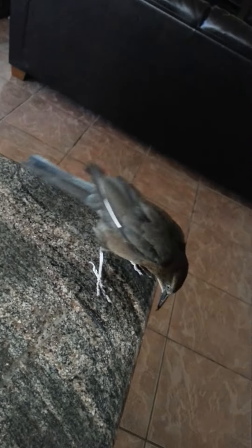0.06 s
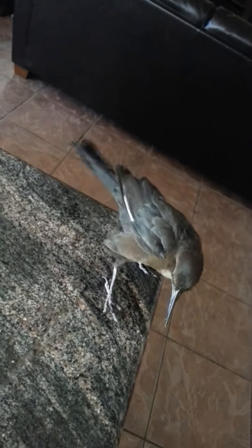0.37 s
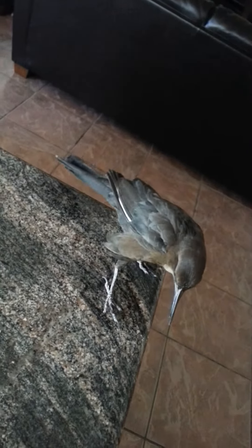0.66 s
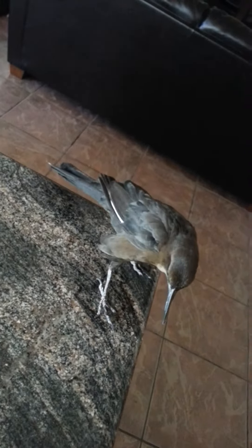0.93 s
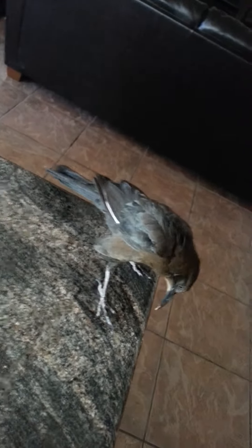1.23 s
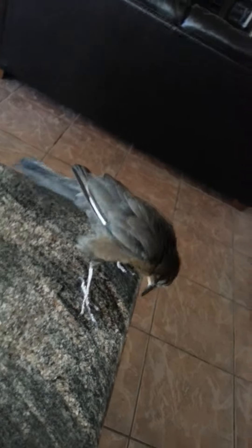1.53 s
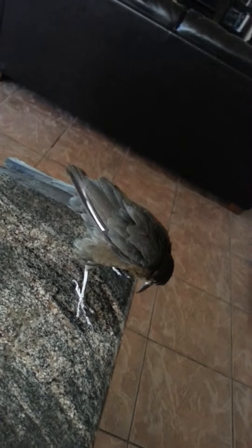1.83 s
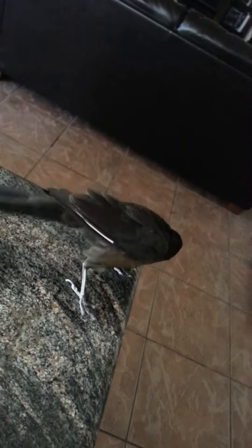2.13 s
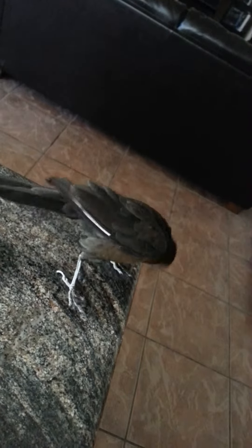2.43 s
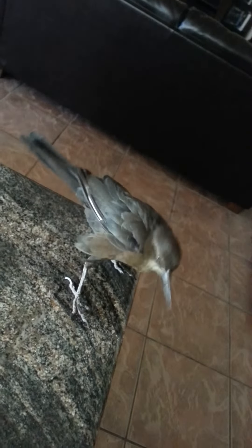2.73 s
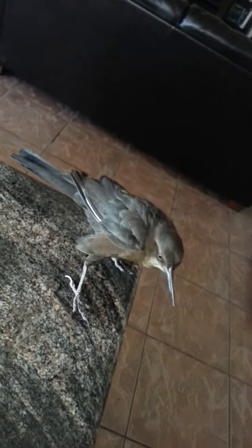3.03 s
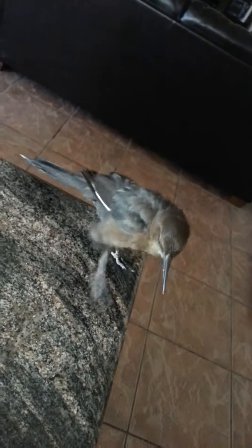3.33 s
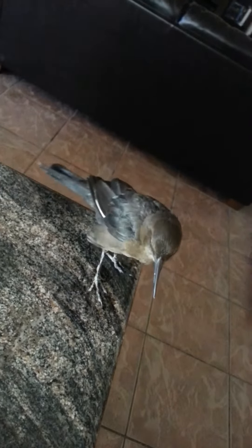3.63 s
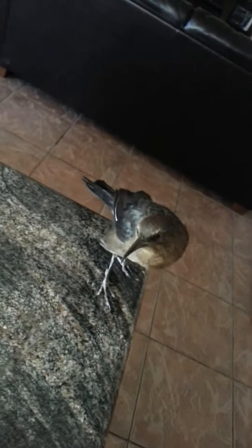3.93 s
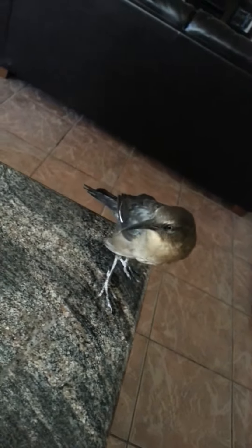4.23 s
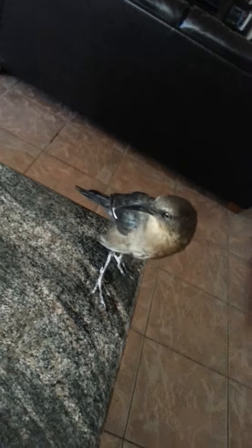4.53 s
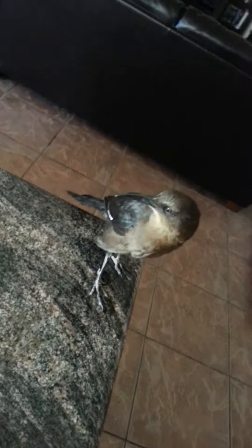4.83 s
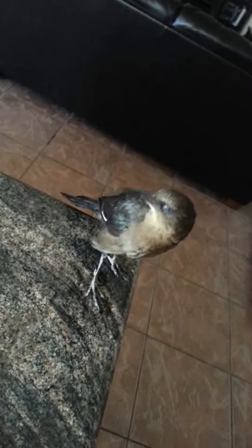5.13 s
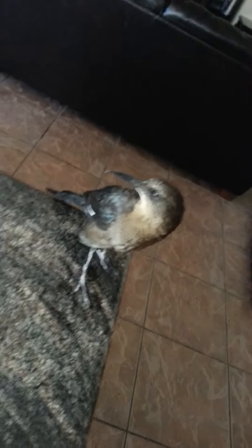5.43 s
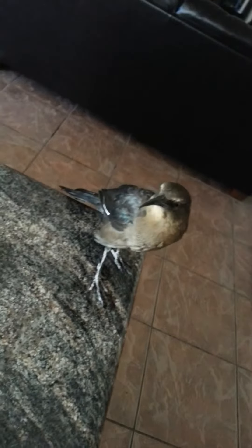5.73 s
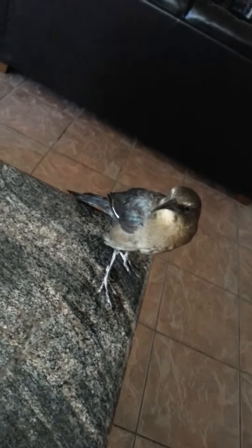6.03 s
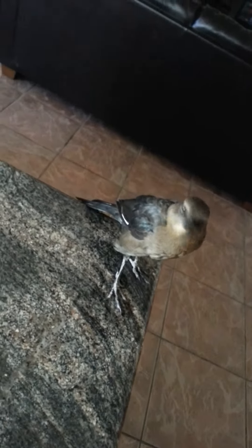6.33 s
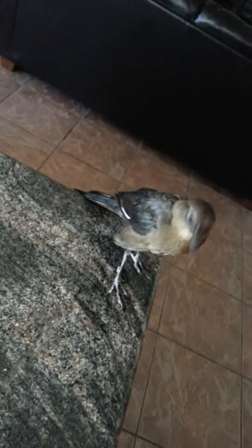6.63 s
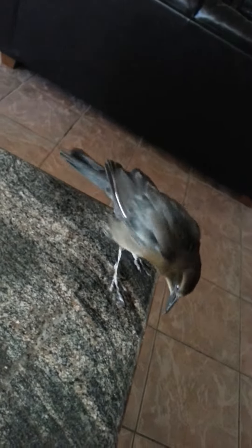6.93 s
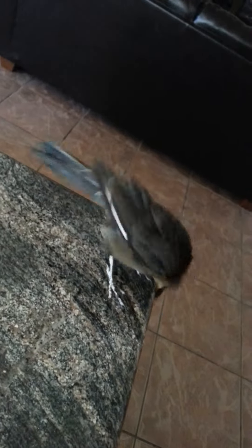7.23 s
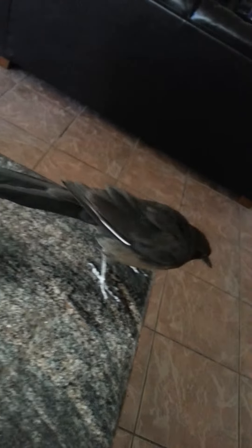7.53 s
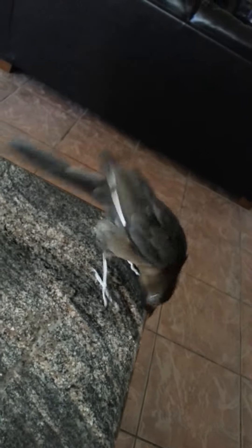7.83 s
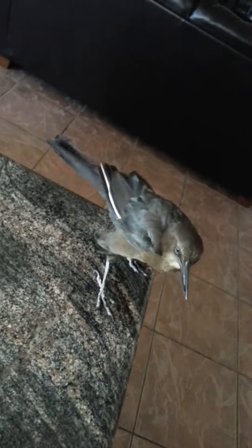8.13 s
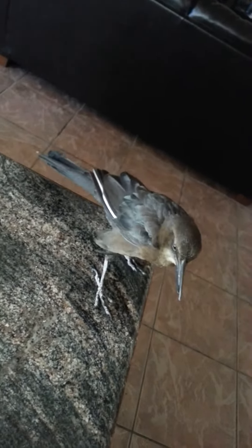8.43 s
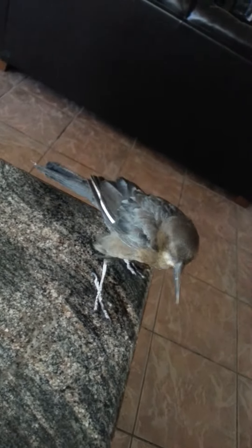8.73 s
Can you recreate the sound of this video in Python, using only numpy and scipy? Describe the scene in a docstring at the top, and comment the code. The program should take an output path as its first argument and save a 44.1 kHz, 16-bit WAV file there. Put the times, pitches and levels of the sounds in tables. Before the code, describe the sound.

A small bird's beak and claws tick irregularly on rug and tile, amid close cloth scuffs and handling bumps.

```python
"""Bird pecking at a rug

A small bird pecks at a rug's edge on a tiled floor: beak and claws tick, and one hard peck rings out.
Close by, cloth scuffs in short strokes at the right microphone port of a hand-held phone, while the
hand rubs, bumps and shifts the booming case. An appliance hums in the small, hard room, and a faint
squeak slides down near the end."""
import sys
import numpy as np
from scipy import signal
from scipy.fft import rfft, irfft
from scipy.io import wavfile
from scipy.ndimage import uniform_filter1d

SR = 44100
rng = np.random.default_rng(int(sys.argv[2]) if len(sys.argv) > 2 else 0)


def log_audio(samples):
    """Write samples as a 16-bit WAV file to the path given in sys.argv[1]."""
    # one column per channel
    frames = np.atleast_2d(samples).T
    # limit to full scale, then quantise
    limited = np.clip(frames, -1, 1)
    pcm = np.round(limited * 32767).astype(np.int16)
    wavfile.write(sys.argv[1], SR, pcm)


N = 396018
T = np.arange(N) / SR

# How the case carries vibration to the ports. Each row: frequency in Hz, left minus right in dB.
CASE_BALANCE = [(100, -4.5), (170, -1), (270, 6), (500, 5.5), (1000, 7), (2000, 8.5)]


def undb(db):
    """Decibels to gain."""
    return 10 ** (np.asarray(db) / 20)


def unit(x):
    """Scale a sound so that the mean of its channels has rms 1."""
    return x / np.sqrt(np.mean(np.atleast_2d(x).mean(axis=0) ** 2))


def pan(db):
    """Left and right gains with mean 1, from left minus right in dB."""
    gains = undb(np.array([[db], [-db]]) / 2)
    return gains / gains.mean()


def curve(rows, column=1, outside=None):
    """One column of a table, joined by straight lines in time."""
    rows = np.array(rows)
    return np.interp(T, rows[:, 0], rows[:, column], outside, outside)


def shape(points):
    """Gain at every frequency from (Hz, dB) points."""
    hz, db = np.transpose(points)
    return undb(np.interp(np.log(np.arange(N // 2 + 1) * SR / N + 1), np.log(hz), db))


def ports(balance):
    """Left and right gains with mean power 1 at every frequency, from (Hz, left minus right dB) points."""
    side = np.sqrt(shape(balance))
    return np.sqrt(2) * np.array([side, 1 / side]) / np.hypot(side, 1 / side)


def colour(x, gain):
    """Filter by a gain at every frequency."""
    return irfft(rfft(x) * gain, N)


def highpass(x, hz):
    """Steep cut of the lows."""
    return signal.sosfilt(signal.butter(4, hz, "high", fs=SR, output="sos"), x)


def bandpass(x, low_hz, high_hz, order):
    """Keep the band between two frequencies."""
    return signal.sosfilt(signal.butter(order, [low_hz, high_hz], "band", fs=SR, output="sos"), x)


def resonate(x, hz):
    """A broad resonance around one pitch."""
    return signal.lfilter(*signal.iirpeak(hz, Q=1.6, fs=SR), x)


def walk(rate):
    """Smooth random drift with spread near 1, taking `rate` new values a second."""
    size = max(int(SR / rate), 2)
    steps = np.repeat(rng.standard_normal(N // size + 1), size)
    return 1.3 * uniform_filter1d(uniform_filter1d(steps, size), size)[:N]


def ring(modes, t):
    """Decaying modes (Hz, t60 s, dB) after one blow."""
    return sum(undb(db - 60 * t / t60) * np.sin(2 * np.pi * hz * t) for hz, t60, db in modes)


def add(out, start, x):
    """Mix a short sound in at `start` seconds."""
    i = max(int(start * SR), 0)
    out[:, i:i + x.shape[-1]] += x[..., :N - i]


def slips(rate, spread_db):
    """Tiny random releases of friction, uneven in size, about `rate` a second."""
    size = undb(spread_db * np.minimum(rng.exponential(size=N), 5))
    return unit((rng.random(N) < rate / SR) * size * rng.choice([-1, 1], N))


def contacts(rows, rise_db_per_s, fall_db_per_s):
    """Gain of sliding contacts (start s, length s, dB): each swells, holds and dies away."""
    level_db = np.full(N, -140.)
    for start, length, db in rows:
        near = slice(*np.searchsorted(T, [start - .5, start + length + .5]))
        t = T[near] - start
        abruptness = 1 + .02 / (length + .02)  # brief flicks have slopes up to twice as steep
        drop_db = rise_db_per_s * np.maximum(-t, 0) + fall_db_per_s * np.maximum(t - length, 0)
        level_db[near] = np.maximum(level_db[near], db - abruptness * drop_db)
    return undb(level_db)


def room(x, wet_db, t60, first_echo_s=0.0048):
    """Floor and furniture answer within milliseconds, then the walls blur the sound."""
    t = T[:SR // 2]
    decay = undb(-60 * t / t60) + 1.6 * undb(-60 * t / .05)
    echoes = rng.standard_normal((2, len(t))) * (t > first_echo_s) * decay
    echoes /= np.sqrt(np.sum(echoes ** 2, axis=1, keepdims=True))
    return x + undb(wet_db) * signal.fftconvolve(x.mean(axis=0)[None], echoes, axes=1)[:, :N]


def room_air():
    """A bed of still air, alike at both ports in the bass and wide in the treble."""
    # Room tone. Each row: frequency in Hz, relative level in dB.
    spectrum = [(32, -42.5), (55, -10), (111, -3.5), (271, -4), (343, -1.5), (424, -10), (588, -10),
                (1080, -22), (2090, -21), (3190, -25.5), (10500, -23), (15000, -29)]
    # How the air reaches the ports. Each row: frequency in Hz, left minus right in dB.
    balance = [(60, -1.5), (250, 3.5), (1800, 6), (4000, 1), (7000, -3.5), (14000, -1)]
    centre = rng.standard_normal(N)
    width = colour(rng.standard_normal(N), shape([(100, -9), (500, -6.5), (1500, 1.5)]))
    air = colour(centre + np.array([[1], [-1]]) * width, shape(spectrum))
    return unit(colour(air, ports(balance))) * undb(-62.5)


def appliance_hum():
    """An appliance hums on three low tones, each wavering in level and phase."""
    # The hum's tones. Each row: frequency in Hz, relative level in dB.
    partials = [(120, -2.5), (240, -13.5), (341, -9)]
    # The hum swells and fades. Each row: time in seconds, level in dB.
    swell = [(0, -60.5), (1.0, -61), (1.3, -65), (4.5, -64.5), (7.9, -62), (8.2, -64), (8.98, -62)]
    hum = sum(undb(db + 4.1 * walk(5)) * np.sqrt(2) * np.sin(2 * np.pi * hz * T + walk(9))
              for hz, db in partials)
    return hum * undb(curve(swell)) * pan(2.7)


def squeak():
    """A faint squeak further off: two thin, unsteady tones sliding down."""
    # The glide. Each row: time in seconds, upper pitch in Hz, level in dB.
    glide = [(8.45, 2660, -97), (8.5, 2480, -70.5), (8.55, 2434, -70), (8.59, 2400, -74), (8.63, 2390, -99)]
    hz = curve(glide) * (1 + .028 * walk(400))
    phase = 2 * np.pi * np.cumsum(hz) / SR
    tones = np.sin(phase) + np.sin(.83 * phase)
    return tones * undb(curve(glide, column=2, outside=-140)) * pan(1.5)


def thuds():
    """The phone shifts in the hand: a deep wobble with a short rub."""
    # Soft thuds. Each row: start in seconds, level in dB, pitch in Hz.
    shifts = [(4.922, -25.5, 87), (4.974, -26, 76.5), (5.213, -33.5, 90), (5.263, -39, 74.6),
              (5.395, -41, 93)]
    out, t = np.zeros((2, N)), T[:SR // 6]
    for start, db, hz in shifts:
        wobble = ring([(hz, .11, 0), (hz * 1.54, .07, -9)], t) * pan(-2.7)
        friction = unit(bandpass(rng.standard_normal(len(t)), 150, 420, order=2))
        rub = undb(-18 - 60 * t / 0.22) * friction * pan(5.9)
        attack = 1 - np.exp(-t / 0.0082)
        add(out, start, undb(db) * attack * (wobble + rub))
    return out


def grip_rubs():
    """The grip sticks and slips on the case, which booms under it."""
    # Slides of the grip. Each row: start in seconds, length in seconds, level in dB.
    rubs = [(.35, 0.027, -48), (.645, 0.17, -50), (.88, 0.1, -59.5), (2.79, 0.12, -49),
            (4.03, 0.056, -51.5), (4.25, 0.033, -52), (5.53, 0.37, -55.5), (5.91, 0.075, -38.5),
            (6.007, 0.024, -34), (6.07, 0.091, -46), (6.28, 0.17, -56), (6.77, 0.25, -50),
            (6.965, 0.017, -37), (7.0, .1, -45.5), (7.295, 0.0046, -55), (7.42, 0.078, -48.5),
            (7.59, 0.067, -46), (7.745, 0.078, -54.5), (8.715, 0.031, -47)]
    # Tone of the rubbed case. Each row: frequency in Hz, relative level in dB.
    spectrum = [(53, -46.5), (90, -27.5), (109, -5), (193, 0.5), (279, 1.5), (320, 3), (402, -6.5),
                (438, -5), (638, -19), (902, -20.5), (1100, -21.5), (1430, -43.5), (2420, -120)]
    friction = unit(colour(slips(rate=1400, spread_db=1.06), shape(spectrum)))
    pressure = contacts(rubs, rise_db_per_s=450, fall_db_per_s=280)
    return colour(friction * pressure, ports(CASE_BALANCE))


def finger_drag():
    """One finger drags slowly over the case; its stutter sets the case ringing."""
    # The drag: start in seconds, length in seconds, level in dB.
    drag = (3.85, 0.15, -34.5)
    # Ring under the finger. Each row: frequency in Hz, t60 in seconds, relative level in dB.
    modes = [(205, 0.061, -36), (262.6, 0.14, -15.5), (394, 0.13, -5), (490, 0.15, 10.5), (1010, 0.11, 0),
             (1285, .07, -17), (1810, .04, -21)]
    # Tone of the sliding skin. Each row: frequency in Hz, relative level in dB.
    spectrum = [(53, -50), (90, -6.5), (209, 13), (238, 0), (259, 11), (368, 4.5), (441, -3.5),
                (494, -28.5), (602, -32), (646, -9), (775, -24), (985, -7.5), (1090, -44), (1300, -9.5),
                (2600, -54.5), (3380, -66), (5720, -120)]
    stutter = slips(rate=560, spread_db=3.5)
    ringing = unit(signal.fftconvolve(stutter, ring(modes, T[:SR // 10]))[:N])
    skin = unit(colour(slips(rate=2500, spread_db=-2.5), shape(spectrum)))
    pressure = contacts([drag], rise_db_per_s=370, fall_db_per_s=500)
    return colour((undb(-10.5) * ringing + skin) * pressure, ports(CASE_BALANCE))


def bumps():
    """A fleshy push booms the case around a pitch set by where it lands; a nail knocks its high modes."""
    # Hand on case. Each row: start in seconds, peak in dB, knock over boom in dB, boom pitch in Hz.
    blows = [(0.37, -48.5, 4, 119), (.778, -35.5, -13, 187), (1.171, -37, -8, 269), (1.257, -45, -14, 246),
             (1.554, -37.5, -13, 326), (1.915, -46, -18.5, 326), (2.425, -45.5, -16, 298),
             (2.829, -30, -23, 193), (3.228, -41.5, -11, 262), (3.3, -37, -10, 303), (4.654, -31, -8, 420),
             (4.711, -41, -20, 318), (4.919, -38.5, -22, 339), (6.002, -14.5, -12.5, 266),
             (6.106, -21.5, 22, 546), (6.287, -38, -6, 307), (6.383, -33.5, 16, 538),
             (6.84, -31.5, -16, 237), (6.957, -10.5, -14.5, 310), (6.973, -20, -25, 338),
             (6.981, -24.5, 3, 339), (7.591, -36, -0.5, 264), (7.67, -25.5, -3.5, 258)]
    # Low and high modes of the case. Each row: frequency in Hz, t60 in seconds, relative level in dB.
    boom_modes = [(162, 0.17, -7.5), (210, .05, -5.5), (265, 0.061, 5), (333.2, 0.074, 3),
                  (444, 0.047, -4.5)]
    knock_modes = [(850, 0.045, 0), (982, 0.03, 0.5), (1310, .02, -14.5), (1950, .02, -4.5),
                   (2320, 0.011, -11.5)]
    out, t = np.zeros((1, N)), T[:SR // 6]
    for start, db, knock_db, hz in blows:
        scuff = 0.091 * undb(-60 * t / 0.028) * rng.standard_normal(len(t))
        push = (t == 0) + scuff
        boom = signal.fftconvolve(push, ring(boom_modes, t))[:len(t)]
        boom = resonate(highpass(boom, 140), hz)
        knock = highpass(signal.fftconvolve(push, ring(knock_modes, t))[:len(t)], 650)
        blow = boom / abs(boom).max() + undb(knock_db) * knock / abs(knock).max()
        add(out, start, undb(db) * blow / abs(blow).max())
    return colour(out, ports(CASE_BALANCE))


def fibres(spectrum, rate, spread_db, patchy_db, shared):
    """Threads slip in bunches that start at once and die away; the two ports share some of them."""
    # Where the cloth sits between the ports. Each row: frequency in Hz, left minus right in dB.
    balance = [(500, -1), (1200, 4.5), (2000, 6.5), (3000, -3), (4500, 0), (7000, -21), (10000, -11.5),
               (14000, -4.5)]
    separate = np.array([slips(rate, spread_db) for _ in range(2)])
    grains = np.sqrt(shared) * slips(rate, spread_db) + np.sqrt(1 - shared) * separate
    onsets = rng.random(N) < 260 / SR
    bunches = signal.lfilter([1], [1, -np.exp(-1 / (0.0059 * SR))], onsets)
    surge = np.minimum((bunches - bunches.mean()) / bunches.std(), 2.5)
    return unit(colour(grains * undb(patchy_db * surge), shape(spectrum) * ports(balance)))


def folds(x, depth_db, width_hz, hold_s=.05):
    """The folds of the cloth keep moving, so its resonances come and go."""
    hz, times, spectra = signal.stft(x, SR, nperseg=512)
    ripple = rng.standard_normal(spectra.shape[1:])
    for _ in range(2):
        ripple = uniform_filter1d(ripple, max(int(width_hz / hz[1]), 1), axis=0)
        ripple = uniform_filter1d(ripple, max(int(hold_s / times[1]), 1), axis=1)
    return signal.istft(spectra * undb(depth_db * ripple / ripple.std()), SR, nperseg=512)[1][:, :N]


def cloth():
    """Each stroke hisses and the weave drags coarsely; the finest threads add a sheen to light strokes."""
    # Scuffs. Each row: start in seconds, length in seconds, level in dB, coarse drag over hiss in dB.
    strokes = [(0.0, 0.014, -51, -7.5), (0.043, 0.048, -56, -11), (.15, .005, -56.5, -9),
               (0.232, 0.023, -46.5, -12.5), (0.347, 0.027, -51.5, -4), (0.473, 0.023, -54, -11),
               (0.613, .03, -50.5, -16.5), (0.639, 0.037, -46.5, -11), (0.727, 0.043, -60.5, -4),
               (0.868, 0.052, -46.5, -8), (0.943, 0.027, -45, -7.5), (1.024, 0.043, -52.5, -21),
               (1.082, 0.025, -47.5, -10.5), (1.17, 0.02, -54, -10.5), (1.396, 0.034, -50.5, -14),
               (1.512, 0.15, -52, -14), (1.722, 0.026, -46.5, -14.5), (1.782, .02, -57, -15),
               (1.835, 0.027, -51.5, -12), (1.904, 0.022, -51.5, -15), (1.975, 0.031, -50, -13),
               (2.038, .02, -55, -21), (2.416, .02, -50, -8.5), (2.486, 0.028, -58, -12),
               (2.539, 0.022, -49, -14), (2.591, 0.041, -58.5, -9.5), (2.713, 0.0068, -58, -24),
               (2.778, 0.097, -48, -7), (2.888, 0.025, -45, -4.5), (2.953, 0.052, -59, -18),
               (3.115, 0.012, -61.5, -11), (3.249, 0.013, -53.5, -20), (3.29, 0.017, -51, -11),
               (3.356, 0.1, -52, -17), (3.507, .03, -37.5, -10.5), (3.559, 0.022, -46, -9),
               (3.857, 0.041, -49.5, -4.5), (3.913, 0.051, -58.5, 4.5), (4.063, 0.047, -51.5, -11),
               (4.151, .07, -50, -14), (4.239, 0.067, -47.5, -9.5), (4.557, 0.016, -56.5, -13),
               (4.661, 0.011, -44, -7.5), (4.704, 0.094, -50, -11), (4.925, 0.017, -63, -14),
               (5.099, 0.019, -52.5, -22), (5.324, .005, -57.5, -12), (5.382, 0.13, -56.5, -15),
               (5.507, .13, -49, -8.5), (5.699, 0.088, -46.5, -9), (5.775, 0.15, -41, -10.5),
               (5.908, .11, -35, -10.5), (6.047, 0.075, -39.5, -6), (6.219, 0.02, -41.5, -15.5),
               (6.285, 0.068, -44.5, -9), (6.356, 0.077, -39.5, -8), (6.485, 0.028, -43.5, -19),
               (6.544, 0.1, -51, -11), (6.778, 0.13, -43, -8), (6.963, 0.065, -32.5, -9.5),
               (7.05, 0.024, -28, -18.5), (7.096, 0.059, -33.5, -17), (7.19, 0.032, -45.5, -15.5),
               (7.253, 0.057, -58, -2.5), (7.4, 0.07, -34.5, -12.5), (7.52, 0.056, -48.5, -13),
               (7.595, 0.079, -45, -6.5), (7.762, 0.051, -36, -12.5), (7.998, 0.0061, -57.5, -13),
               (8.241, .01, -62.5, -17), (8.32, 0.0073, -62, -13)]
    # Cloth stirring faintly on the phone. Each row: start in seconds, end in seconds, level in dB.
    resting = [(0.0, 2.2, -69.5), (2.42, 3.02, -70.5), (3.25, 3.66, -63), (4.05, 5.1, -70.5),
               (5.35, 7.96, -66)]
    # The cloth's three textures. Each row: frequency in Hz, relative level in dB.
    hiss_spectrum = [(1470, -21.5), (2500, -13.5), (2880, -13.5), (3500, -11), (5050, -8), (5600, -6.5),
                     (6060, -4.5), (6880, 2.5), (7450, 1.5), (8400, -5.5), (9800, -17), (12700, -51.5),
                     (21600, -120)]
    coarse_spectrum = [(290, -32.5), (500, 1), (690, -7.5), (860, 2.5), (1150, -0.5), (1450, -1),
                       (1820, 4.5), (2100, -3), (2700, -6), (4000, -4.5), (5200, -35), (8800, -92)]
    sheen_spectrum = [(7500, -31.5), (9300, -1), (10200, -1.5), (11500, -5.5), (13000, -6.5), (14500, -18),
                      (16000, -36)]
    slopes = dict(rise_db_per_s=620, fall_db_per_s=255)
    ordinary_stroke_db = -49.5
    stir = contacts([(start, end - start, db) for start, end, db in resting], **slopes)
    stir *= undb(3.5 * walk(16))
    slides = [(start, length, db) for start, length, db, _ in strokes]
    drags = [(start, length, db + coarse_db) for start, length, db, coarse_db in strokes]
    slide_gain = np.hypot(contacts(slides, **slopes), stir)
    drag_gain = np.hypot(contacts(drags, **slopes), undb(-6.5) * stir)
    hiss = fibres(hiss_spectrum, rate=9000, spread_db=2.0, patchy_db=1.87, shared=0.16)
    coarse = fibres(coarse_spectrum, rate=4500, spread_db=3.5, patchy_db=2.5, shared=0.12)
    sheen = fibres(sheen_spectrum, rate=14000, spread_db=3.5, patchy_db=2.0, shared=0.16)
    effort_db = np.maximum(20 * np.log10(slide_gain) - ordinary_stroke_db, -30)
    treble = hiss + undb(-9.5 - 0.3 * effort_db) * sheen  # harder strokes are duller
    treble[0] *= undb(-0.0339 * effort_db)  # and lie closer to the right port
    return folds(slide_gain * treble + drag_gain * coarse, depth_db=2.4, width_hz=380)


def ticks():
    """Each tick is a sharp crack that catches again and rings the microphone port near 7.5 kHz."""
    # Beak, claws and snagging threads. Each row: start in seconds, peak in dB, left minus right in dB.
    hits = [(0.4752, -32.5, 0), (0.501, -31.5, -3), (0.532, -38, -6), (0.9436, -27.5, -3), (0.967, -29, 0),
            (1.0835, -31, -21), (1.0967, -33, -23), (1.734, -39, -18), (1.742, -39, -7), (1.988, -30.5, -1),
            (2.1183, -37.5, 0), (2.143, -34.5, -3), (2.5369, -35, -17), (2.6, -32.5, -9), (2.8946, -27, -8),
            (2.9072, -33, 2), (2.9548, -34, -5), (3.129, -43, -4), (3.249, -39.5, -2), (3.3062, -31, -1),
            (3.5014, -25.5, -12), (3.543, -36, -10), (4.247, -32, -2), (4.2682, -32.5, -6),
            (4.6544, -32, -5), (4.779, -29.5, -2), (4.7948, -39, -6), (5.022, -45, -5), (5.3255, -39, 1),
            (5.7788, -23, -13), (5.911, -23, -14), (5.9194, -18.5, -15), (6.2287, -24, -23),
            (6.3836, -21.5, -27), (6.422, -24, -23), (6.4843, -28, -28), (6.773, -34, -16),
            (6.995, -16, -22), (7.048, -15, -27), (7.0662, -17, -17), (7.1005, -20, -26),
            (7.139, -17.5, -25), (7.395, -27, -17), (7.6737, -27, -1), (7.75, -31, -23), (7.757, -27, -15),
            (7.773, -25, -26), (7.7872, -24, -18), (7.886, -37, -14), (7.998, -43.5, -2), (8.2489, -40, 0),
            (8.3258, -40.5, -2)]
    port_hz, pitch_scatter = 7470, 0.04
    out, t = np.zeros((2, N)), T[:SR // 20]
    for start, db, side_db in hits:
        hz = port_hz * np.exp(pitch_scatter * rng.standard_normal())
        since_catch = t - rng.uniform(0.0036, 0.016)
        catch = (since_catch > 0) * undb(-10 - 60 * abs(since_catch) / .005)
        tail = undb(-20 - 60 * t / .03)
        force = undb(-60 * t / .015) + catch + tail
        crack = rng.choice([-1, 1], (2, len(t))) * force
        tick = resonate(crack, min(hz, SR / 3)) + 0.072 * crack
        # threads snagging at the right port are duller than claws on tile
        edge_hz = np.clip(12997 + 190 * side_db, 8000, 15000)
        tick = bandpass(tick, 1000, edge_hz, order=3) * pan(side_db)
        add(out, start, undb(db) * tick / abs(tick.mean(axis=0)).max())
    return out


def peck():
    """The beak strikes tile: a few very short, bright modes with a hollow lowest pair."""
    # The hard peck. Each row: start in seconds, gain in dB.
    strikes = [(0.8606, -3)]
    # Beak and tile modes. Each row: frequency in Hz, t60 in seconds, level in dB, left minus right in dB.
    modes = [(2020, 0.015, -25, 32.5), (2240, 0.0037, -11, 6), (2910, 0.006, -24, -6),
             (4200, 0.0034, -17, -12), (6170, 0.0087, -15.5, -12), (7880, 0.0033, -8.5, -15),
             (10100, 0.0041, -2.5, -25), (10660, 0.0024, -9, -4)]
    out, t = np.zeros((2, N)), T[:SR // 40]
    clack = sum(pan(side_db) * ring([(hz, t60, db)], t) for hz, t60, db, side_db in modes)
    attack = 1 - np.exp(-t / .0001)
    for start, db in strikes:
        add(out, start, undb(db) * highpass(clack * attack, 1800))
    return out


def scene():
    """The bird in the room, cloth and hand at the phone, over air and hum."""
    hard_peck = room(peck(), wet_db=-5.5, t60=0.21)
    small_sounds = room(ticks() + squeak(), wet_db=-15.5, t60=0.29)
    handling = room(cloth() + bumps(), wet_db=-10.5, t60=0.3) + grip_rubs() + finger_drag() + thuds()
    return hard_peck + small_sounds + handling + room_air() + appliance_hum()


def record(dry):
    """The phone's noise suppressor turns quiet moments down; the highest treble is cut."""
    threshold_db, knee_db, quiet_db, top_hz = -61, 8, -8.5, 14650
    power = uniform_filter1d(np.mean(dry ** 2, axis=0), int(.06 * SR))
    level_db = 10 * np.log10(np.abs(power) + 1e-12)
    opening = np.clip((level_db - threshold_db) / knee_db, 0, 1)
    gated = dry * undb(quiet_db * (1 - opening))
    return signal.sosfilt(signal.ellip(8, .2, 70, top_hz, fs=SR, output="sos"), gated)


dry = scene()
out = record(dry)
log_audio(out)
```